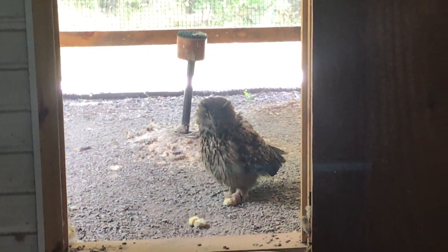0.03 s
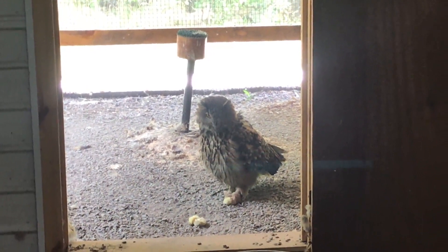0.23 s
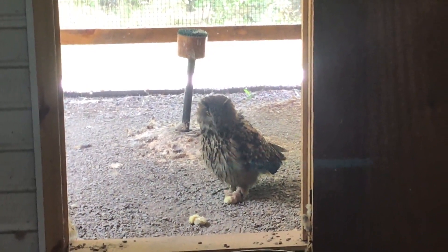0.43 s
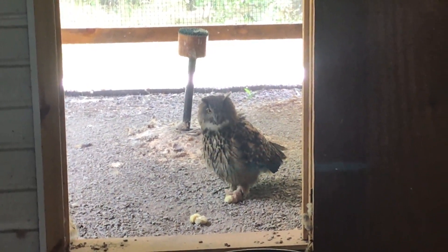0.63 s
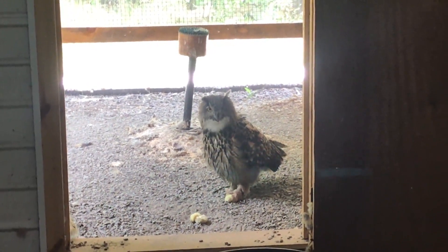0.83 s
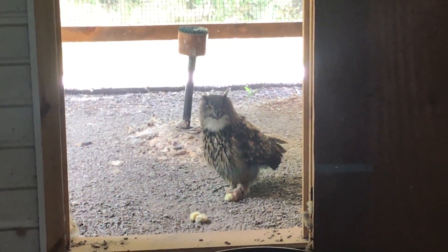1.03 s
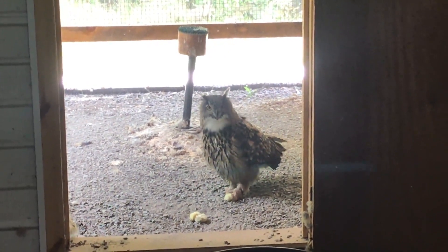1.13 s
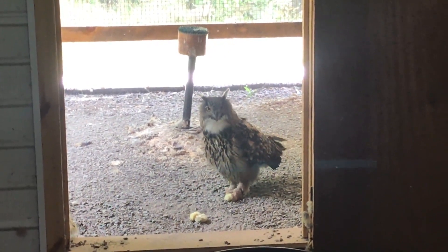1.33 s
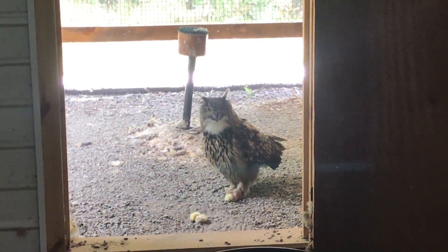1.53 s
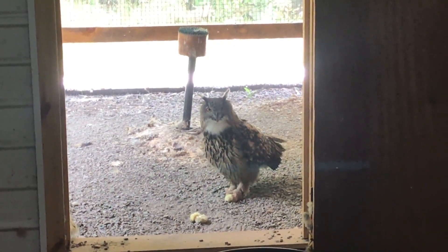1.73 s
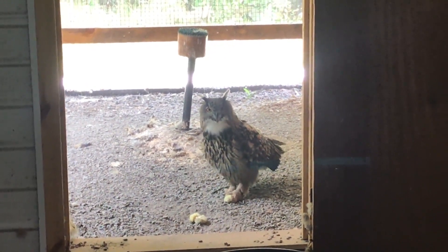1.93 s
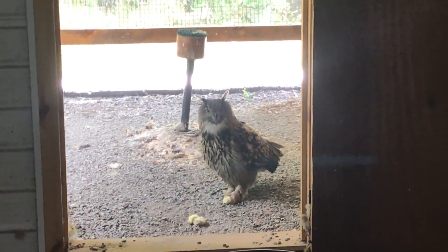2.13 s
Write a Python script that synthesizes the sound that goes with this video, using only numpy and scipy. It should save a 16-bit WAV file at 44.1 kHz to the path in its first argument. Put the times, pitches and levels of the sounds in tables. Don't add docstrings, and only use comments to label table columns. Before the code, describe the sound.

A large owl hoots once in a wooden barn. Soft hiss and very faint mains hum run throughout; tiny distant songbirds chatter around 0.3-0.55 s. At 1.2 s a slight puff opens the deep, round hoot, which leaps up quickly, then slides down and weakens, coloured by short wall echoes. Birds chatter again from 1.6 s; about 1.84 s the call ends in a faint, uneven creak, gone by 1.97 s.

```python
import sys
import numpy as np
from scipy import signal
from scipy.io import wavfile
from scipy.ndimage import uniform_filter1d

SR = 44100
rng = np.random.default_rng(int(sys.argv[2]) if len(sys.argv) > 2 else 0)


def voltage_ratio(level):
    return 10 ** (np.asarray(level, float) / 20)


def to_wav(sig):
    pcm = np.clip(np.atleast_2d(sig), -1, 1) * 32767
    pcm = np.round(pcm).astype(np.int16)
    wavfile.write(sys.argv[1], SR, pcm.T)


N = 95564

# f/Hz, level/dB rms
HUM_LINES = [(59.2, -63), (118.4, -76.5), (177.6, -73), (382.2, -87), (414.5, -84.5), (473.7, -99)]
HUM_WAVER_DB = 0.8

# f/Hz, density/dB per Hz
RUMBLE_SPECTRUM = [(15, -58.5), (30, -32), (42, -8), (60, 9), (85, -15), (130, -6.5), (200, -7),
                   (400, -8.5), (700, -12)]
# f/Hz, density/dB per Hz
HISS_SPECTRUM = [(700, -9.5), (1000, -15), (2000, -20), (3200, -19), (5000, -22.5), (7500, -26.5),
                 (10400, -30.5), (15500, -30)]
# f/Hz, width/Hz, gain/dB
MIC_NOTCHES = [(7620, 550, -3.5), (10300, 250, -5.5)]
FLOOR_DB, PATCHY_DB = -65.5, 0.62

# start/s, length/s, centre f/Hz, width/Hz, level/dB
FAR_TRILLS = [
    (.27, .23, 3200, 1400, -76),
    (1.74, .24, 3100, 1200, -74),
]
TRILL_RATE_HZ = 45

# start/s, length/s, start f/Hz, end f/Hz, level/dB
BIRD_NOTES = [(.275, 0.048, 2980, 2940, -70.5), (.32, .04, 3600, 3365, -70), (.335, 0.033, 2900, 3140, -73),
              (.365, 0.034, 2750, 2500, -70.5), (.37, 0.041, 3650, 3810, -74),
              (.395, 0.047, 3300, 2875, -69.5), (.405, 0.057, 3950, 3900, -77),
              (.45, 0.036, 3500, 3850, -74), (.51, 0.037, 3950, 4070, -76),
              (1.265, 0.077, 8800, 8750, -80.5), (1.28, 0.087, 5850, 5950, -77),
              (1.635, 0.059, 3183, 3214, -69), (1.68, 0.035, 3850, 4100, -68),
              (1.70, 0.072, 3320, 3170, -70), (1.7, 0.067, 4290, 4290, -70.5),
              (1.755, 0.065, 3250, 3310, -69), (1.775, 0.022, 2520, 2550, -68.5),
              (1.79, 0.026, 3000, 2754, -73), (1.825, 0.037, 3200, 3100, -69.5),
              (1.83, 0.038, 2550, 2540, -95), (1.845, .04, 2700, 2730, -70),
              (1.87, 0.023, 3450, 3390, -69.5), (1.88, 0.043, 2700, 3120, -84),
              (1.955, 0.022, 3100, 3050, -69)]
BIRD_WIDTH_HZ, BIRD_BLUR = 20, 0.6
YARD_DB, YARD_T60_S = -6, 0.3

# t/s, pitch f/Hz, effort level/dB
HOOT_TRACK = [
    (1.215, 224.3, -62.9),
    (1.239, 261.7, -50.5),
    (1.249, 304.7, -38.8),
    (1.277, 329.7, -39.0),
    (1.325, 312.0, -40.0),
    (1.466, 286.0, -42.5),
    (1.576, 256.0, -47.5),
    (1.715, 233.0, -51.7),
    (1.813, 196.0, -63.8),
]
SYRINX_DB = [-0.3, 0.62, 1, 6.5, 2.5, -6.5, -11, -13, -14.5, -8.5]
# f/Hz, gain/dB
THROAT_GAIN = [(150, 0.5), (650, -0.8), (800, -21), (900, -24), (1000, -33.5), (1250, -36), (1600, -28.5),
               (2000, -32.5), (3200, -36)]
# f/Hz, width/Hz, level/dB
GULLET_MODES = [(204, 46, -1), (292, 53, 3), (470, 100, 4.5), (650, 67, -1), (966, 300, -33)]
HOOT_DB, BREATH_DB, SHIMMER_DB = 0.36, -34.5, 0.5
RELEASE_S, JITTER = 0.008, 0.003
FLUTTER_HZ, FLUTTER_WIDTH_HZ, FLUTTER_DEPTH = 88, 97, 0.027
PUFF_START_S, PUFF_LENGTH_S, PUFF_DB = 1.203, 0.05, -61

# delay/ms, gain/1
WALL_ECHOES = [(6.39, -0.62), (13.2, 1.0), (17.28, -0.35), (17.55, -0.17), (21.5, -0.25), (23.13, 1.0),
               (27.62, -0.17), (33.06, 0.25), (40.54, -0.17), (41.5, -0.25), (56.6, 0.35), (56.87, -0.25),
               (57.55, -0.17), (67.89, 0.47), (68.03, -0.25), (71.02, -0.1), (82.18, -0.17),
               (100.54, -0.17), (102.31, -0.25), (107.62, -0.1)]
WALL_CUTOFF_HZ, WALL_TREBLE = 1100, 0.3
TAIL_DB, TAIL_T60_S = -14, 0.35

# t/s, pulse rate f/Hz, level/dB
CREAK_TRACK = [
    (1.835, 200, -72),
    (1.855, 190, -59),
    (1.868, 142, -57),
    (1.91, 137, -60),
    (1.93, 135, -66),
    (1.97, 130, -80),
]
CREAK_JITTER, CREAK_UNEVEN, CREAK_AIR = 0.18, 0.55, 0.4
CREAK_TONE_DB, CREAK_PULSE_DB = -5, 3.0


def evened(x):
    return x / np.sqrt(np.mean(x ** 2) + 1e-20)


def read(points, hz):
    f, value = np.transpose(points)
    return np.interp(np.log(hz + 1), np.log(f + 1), value)


def slow(size):
    once = uniform_filter1d(rng.standard_normal(N), size)
    return evened(uniform_filter1d(once, size))


def resonate(x, hz, width_hz):
    turn = np.exp(2j * np.pi * np.cumsum(hz * np.ones(len(x))) / SR)
    r = np.exp(-np.pi * width_hz / SR)
    baseband = signal.lfilter([1 - r], [1, -r], x / turn + 1e-18)
    return 2 * (turn * baseband).real


def resonate_twice(x, hz, width1_hz, width2_hz):
    return evened(resonate(resonate(x, hz, width1_hz), hz, width2_hz))


def gullet(x, modes):
    return sum(voltage_ratio(db) * resonate_twice(x, hz, width, 2 * width) for hz, width, db in modes)


def tail(x, t60_s, start_s):
    t = np.arange(SR // 2) / SR
    taps = rng.standard_normal(len(t)) * voltage_ratio(-60 * t / t60_s) * (t > start_s)
    return signal.fftconvolve(x, taps / np.linalg.norm(taps))[:N]


def hum():
    t = np.arange(N) / SR
    out = np.zeros(N)
    for hz, db in HUM_LINES:
        level = np.sqrt(2) * voltage_ratio(db + HUM_WAVER_DB * slow(size=1500))
        out += level * np.sin(2 * np.pi * (hz * t + rng.random()))
    return out


def floor():
    frames, hz = N // 512 + 5, np.fft.rfftfreq(2048, 1 / SR)
    a, b, patches = rng.standard_normal((frames, 1025, 3)).T
    patches = evened(uniform_filter1d(uniform_filter1d(patches, 20, 0), 6, 1))
    db = read(RUMBLE_SPECTRUM[:-1] + HISS_SPECTRUM, hz)
    db = db + sum(g * np.exp(-((hz - f) / w) ** 2) for f, w, g in MIC_NOTCHES)
    z = (a + 1j * b) * voltage_ratio(db[:, None] + PATCHY_DB * patches)
    noise = signal.istft(z, nperseg=2048, noverlap=1536)[1][:N]
    return voltage_ratio(FLOOR_DB) * evened(noise)


def trills():
    t, out = np.arange(N) / SR, np.zeros(N)
    throb = 1 + 0.6 * np.sin(2 * np.pi * TRILL_RATE_HZ * t)
    for start, length, hz, width, db in FAR_TRILLS:
        haze = resonate_twice(rng.standard_normal(N), hz, width, width)
        swell = np.sin(np.pi * np.clip((t - start) / length, 0, 1))
        out += voltage_ratio(db) * haze * throb * swell
    return out


def birds():
    out, wobble = np.zeros(N), slow(size=120)
    for start, length, hz0, hz1, db in BIRD_NOTES:
        u, at = np.linspace(0, 1, round(length * SR)), round(start * SR)
        spread_hz = BIRD_WIDTH_HZ + BIRD_BLUR * abs(hz1 - hz0)
        hz = hz0 + (hz1 - hz0) * u + spread_hz * wobble[at:at + len(u)]
        envelope = voltage_ratio(db - 2.5) * np.sin(np.pi * u) ** 0.31
        out[at:at + len(u)] += envelope * np.sin(2 * np.pi * np.cumsum(hz) / SR)
    return out + voltage_ratio(YARD_DB) * tail(out, YARD_T60_S, 0.0017)


def puff():
    t = np.arange(N) / SR
    air = evened(gullet(rng.standard_normal(N), GULLET_MODES[1:]))
    return air * voltage_ratio(PUFF_DB) * np.sin(np.pi * np.clip((t - PUFF_START_S) / PUFF_LENGTH_S, 0, 1))


def hoot():
    t, (s, pitch_hz, effort_db) = np.arange(N) / SR, np.transpose(HOOT_TRACK)
    hz = np.interp(t, s, pitch_hz)
    turns = np.cumsum(hz * (1 + JITTER * slow(size=150))) / SR
    tone = np.zeros(N)
    for k, db in enumerate(SYRINX_DB, 1):
        shimmer_db = SHIMMER_DB * max(k - 2, 0) * slow(size=500)
        level = voltage_ratio(db + read(THROAT_GAIN, k * hz) + shimmer_db)
        tone += level * np.cos(2 * np.pi * k * turns + k * k)
    wander = evened(resonate(rng.standard_normal(N), FLUTTER_HZ, FLUTTER_WIDTH_HZ))
    flutter = 1 + FLUTTER_DEPTH * wander
    breath = voltage_ratio(BREATH_DB) * resonate_twice(rng.standard_normal(N), 780, 500, 500)
    gate = (t > s[0]) * np.exp(-np.maximum(t - s[-1], 0) / RELEASE_S)
    effort = voltage_ratio(HOOT_DB + np.interp(t, s, effort_db))
    return gate * effort * (flutter * tone + breath)


def barn(x):
    taps = np.zeros(SR // 5)
    for delay_ms, gain in WALL_ECHOES:
        taps[round(delay_ms * SR / 1000)] += gain
    dull = np.convolve(x, signal.firwin(201, WALL_CUTOFF_HZ, fs=SR), "same")
    dull = dull + WALL_TREBLE * (x - dull)
    echoes = signal.fftconvolve(dull, taps)[:N]
    return x + echoes + voltage_ratio(TAIL_DB) * tail(x, TAIL_T60_S, 0.02)


def creak():
    t, (s, rate_hz, db) = np.arange(N) / SR, np.transpose(CREAK_TRACK)
    hz = np.interp(t, s, rate_hz)
    cycle = np.floor(np.cumsum(hz * (1 + CREAK_JITTER * slow(size=200))) / SR)
    strength = (1 - CREAK_UNEVEN * (cycle % 2)) * voltage_ratio(CREAK_PULSE_DB * slow(size=100))
    pulses = evened(np.diff(cycle, prepend=0) * strength)
    source = (1 - CREAK_AIR) * pulses + CREAK_AIR * rng.standard_normal(N)
    ring = evened(gullet(source, GULLET_MODES))
    tone = voltage_ratio(CREAK_TONE_DB) * np.sin(2 * np.pi * np.cumsum(hz) / SR)
    return (ring + tone) * voltage_ratio(np.interp(t, s, db, left=-200, right=-200))


def scene():
    background = hum() + floor() + trills() + birds()
    owl = barn(hoot() + puff()) + creak()
    return (background + owl)[None]


def band_limit(x):
    return signal.sosfilt(signal.butter(12, 15660, fs=SR, output="sos"), x)


def record(dry):
    return band_limit(dry)


dry = scene()
out = record(dry)
to_wav(out)
```